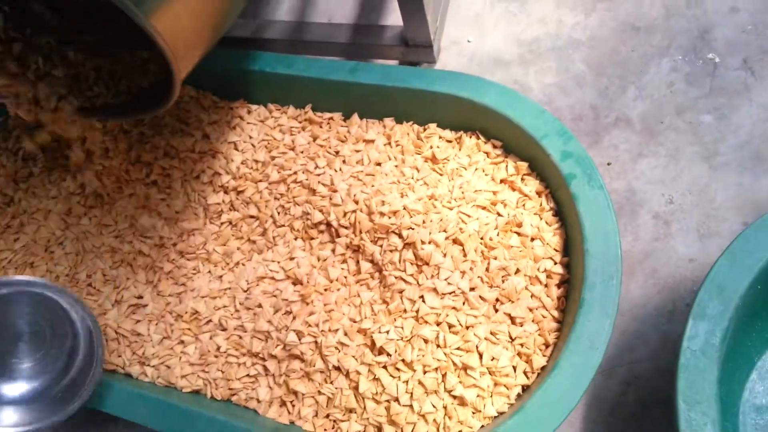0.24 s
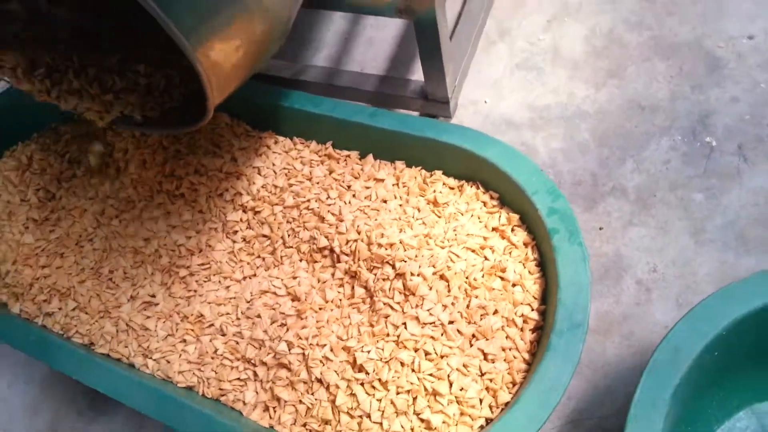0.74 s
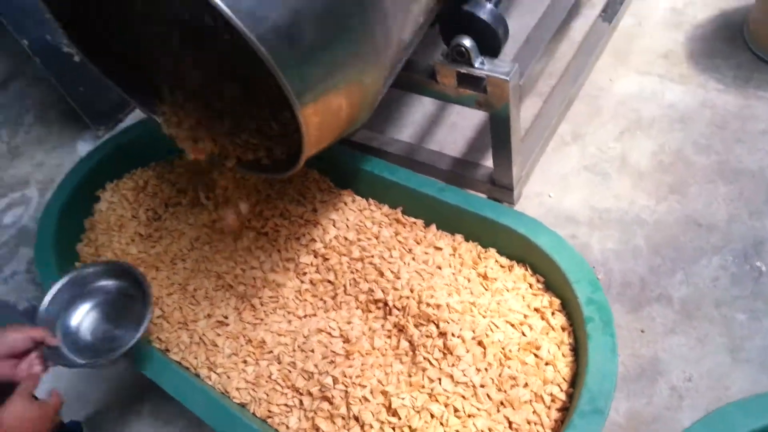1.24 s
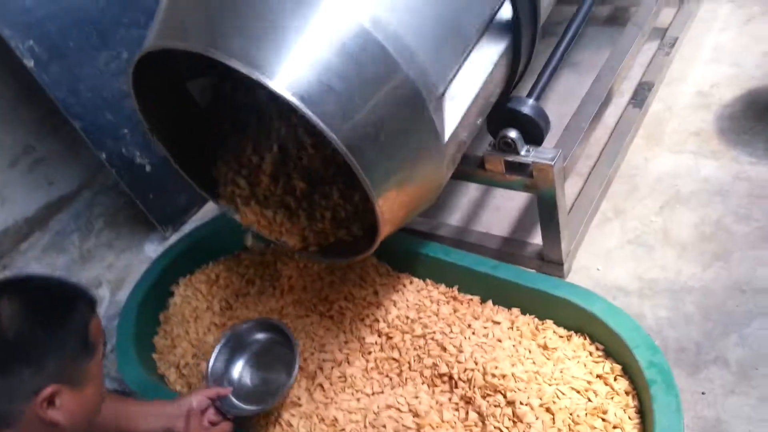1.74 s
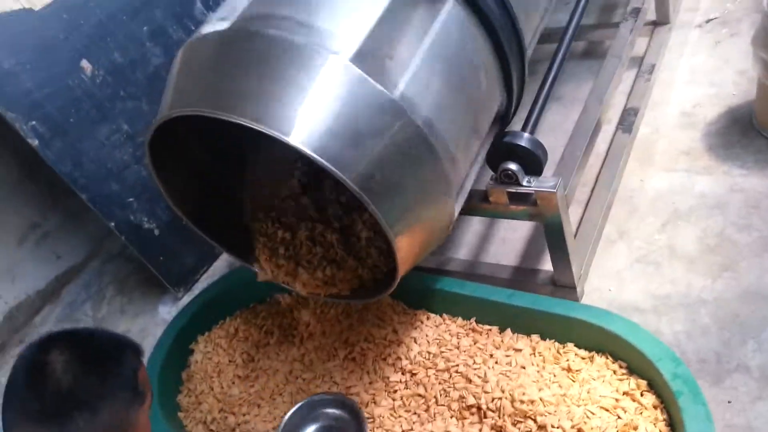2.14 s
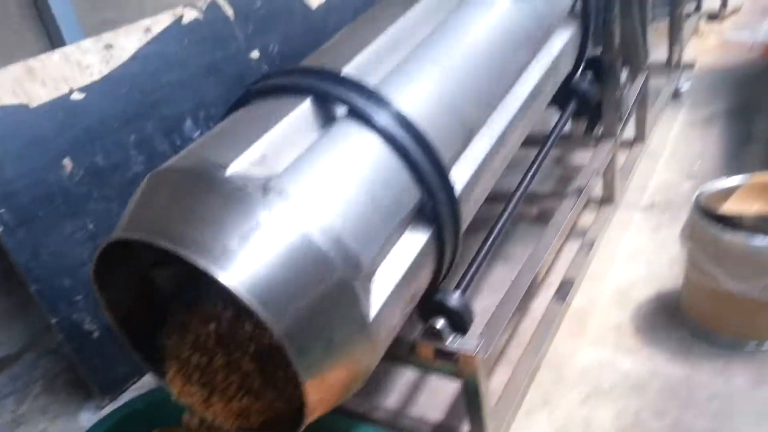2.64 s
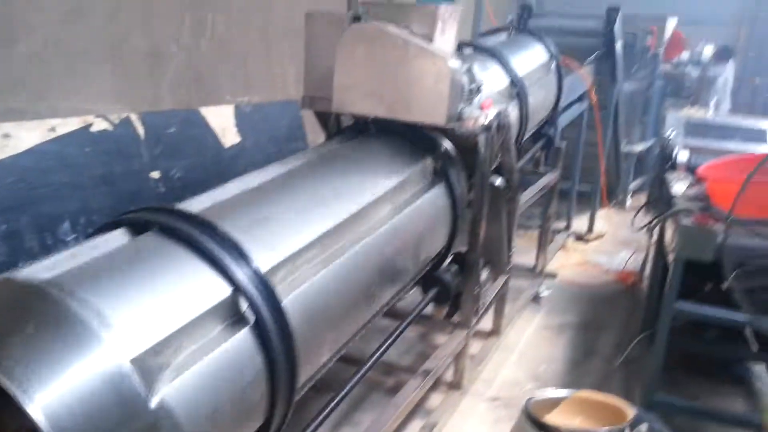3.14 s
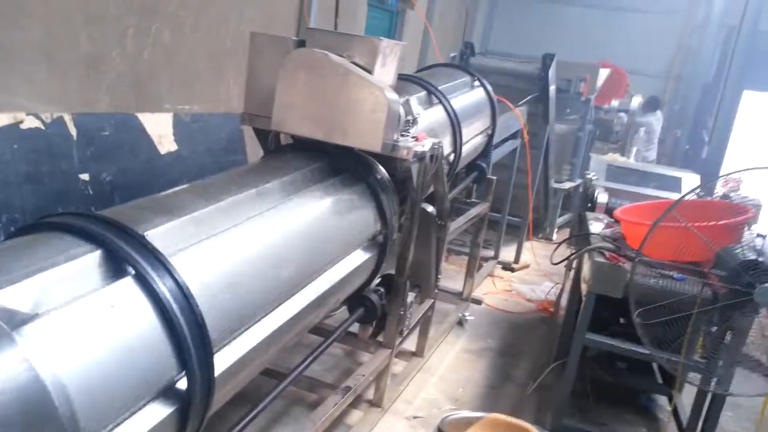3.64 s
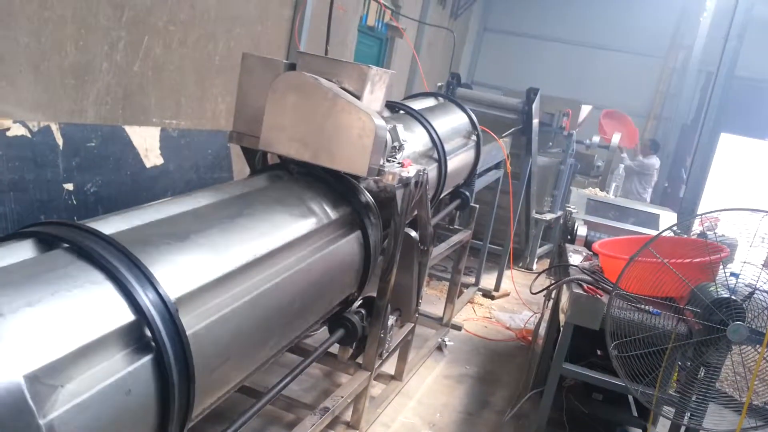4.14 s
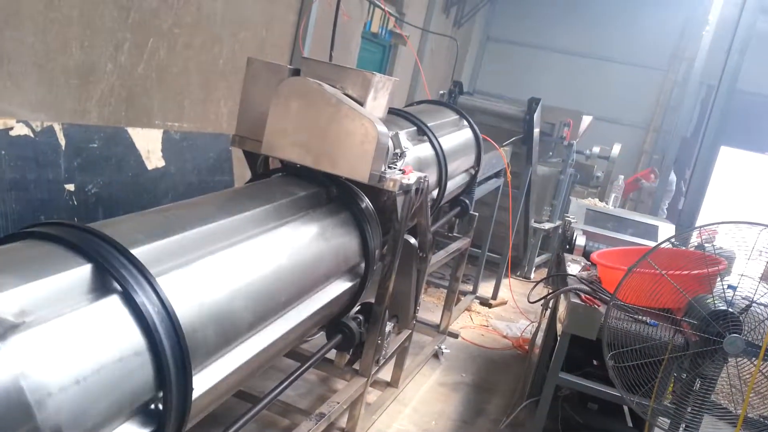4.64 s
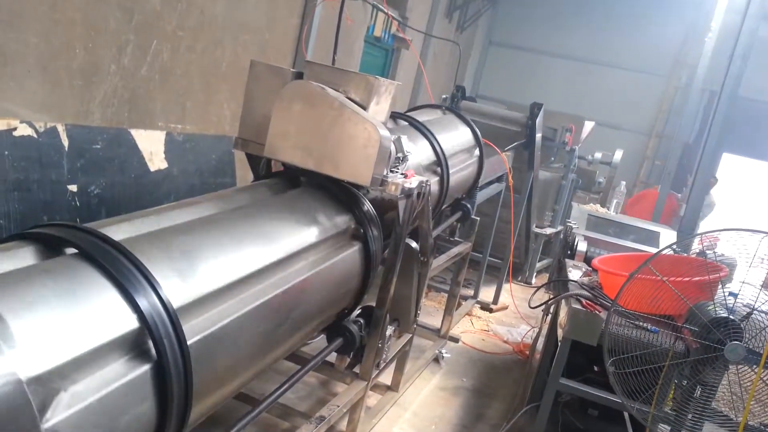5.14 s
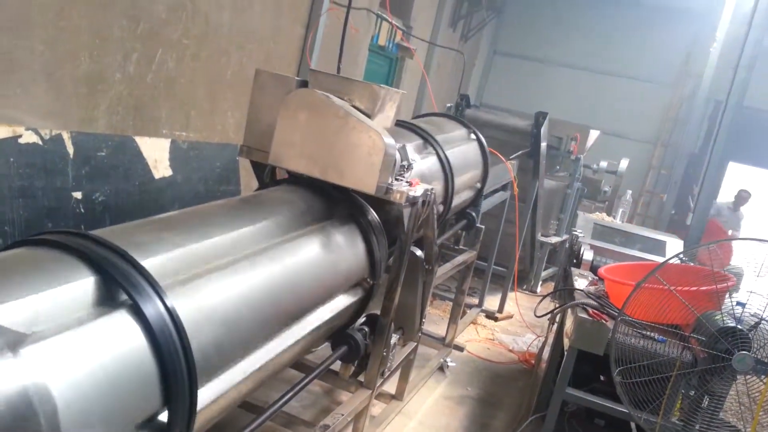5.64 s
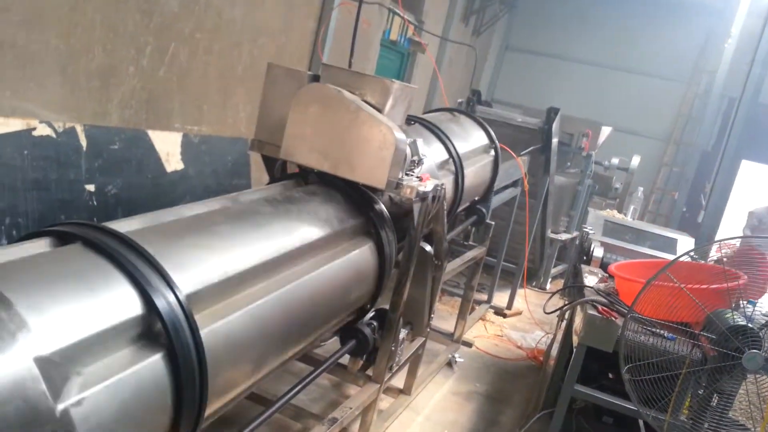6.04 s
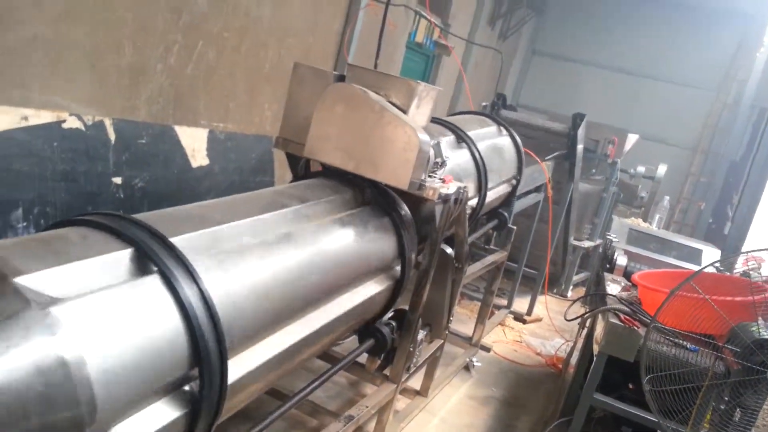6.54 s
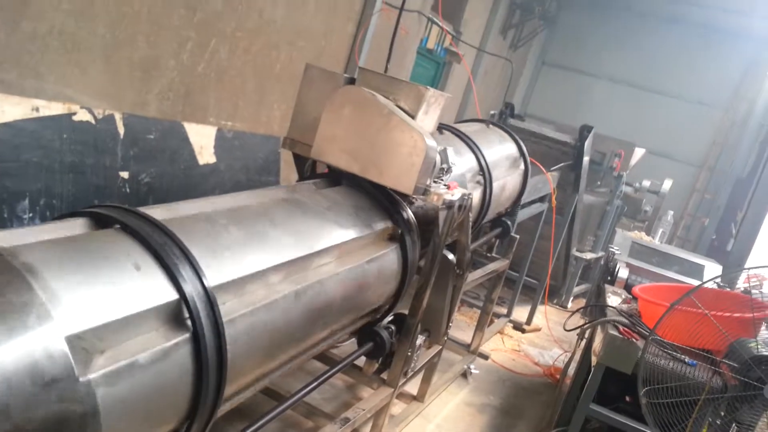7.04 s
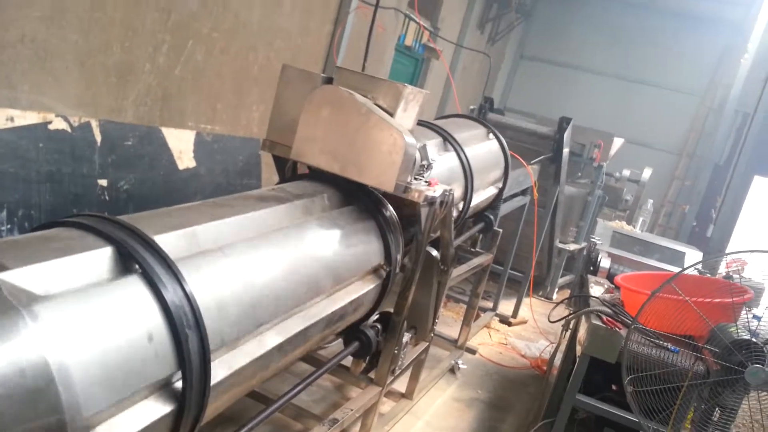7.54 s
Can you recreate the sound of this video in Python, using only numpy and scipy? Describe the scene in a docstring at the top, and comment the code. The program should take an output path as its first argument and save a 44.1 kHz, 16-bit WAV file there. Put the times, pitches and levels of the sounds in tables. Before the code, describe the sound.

A loud, dense, unbroken rush of light, dry pellets tumbling in a turning steel drum fills the whole eight seconds, wide in stereo and close. Countless clicks blend into midrange rattle, brighter clatter and crisp brittle crackle, with tiny short metallic pings. From 0 to about 1.5 s pellets also patter dully into a plastic tub, with small low bumps near 0.3 s and a faint high tick on the left at 1 s. Around 1.9 to 2.4 s the microphone crosses the drum's open mouth and a hollow, fluttering boom swells with soft thuds. By 3.3 s it is beside the drum: the boom recedes, the crackle eases, and a motor buzz with a steady whine near 900 Hz becomes clear, beating about twice a second. The load surges gently once a second over faint shell rumble, continuing to the end without stopping.

```python
"""In a workshop, fried snack pellets tumble in a turning steel drum and spill from its mouth into a tub.
Thousands of random light clicks merge into a rush, a clatter and a crackle; single pellets ping as short sines.
The open tube booms through its air resonances, the shell rumbles, and the geared drive buzzes and whines.
The stereo microphone starts at the mouth, passes its opening near 2 s, then moves beside the drum to the drive."""
import sys
import numpy as np
from scipy import signal
from scipy.fft import rfft, irfft, next_fast_len
from scipy.io import wavfile
from scipy.ndimage import uniform_filter1d, minimum_filter1d

SR = 44100
rng = np.random.default_rng(int(sys.argv[2]) if len(sys.argv) > 2 else 0)


def digitize_waveform(pressure):
    """Quantize a signal to 16-bit integers and store it at the path in sys.argv[1].

    Rows of a 2-D input are taken as channels; values are limited to [-1, 1].
    """
    field = np.atleast_2d(pressure).T
    bounded = np.clip(field, -1, 1)
    quanta = np.round(bounded * 32767).astype(np.int16)
    wavfile.write(sys.argv[1], SR, quanta)


N = 343971
TIME = np.arange(N) / SR

# Most spectra give shape only, their layers being brought to rms 1; the buzz spectrum sets its level directly.
# Microphone path: (time [s], place [0 = at the mouth, 1 = beside the drum, nearest the drive])
MIC_PATH = [(0, 0.053), (1.0, 0.4), (2.0, 0.069), (2.7, 0.13), (3.25, 0.68), (3.8, 0.74), (5.0, 0.88),
            (5.8, 0.93), (7.8, 0.97)]
# Flow changes as a bigger heap lets go or the flow thins, before each layer takes its share:
# (time [s], half length [s], change [dB])
HEAP_SLIDES = [(.645, .025, 0.5), (.73, .08, 0.3), (.98, .015, -2), (1.105, .02, -1.4), (1.298, 0.055, 0),
               (1.86, .025, 1.5), (1.915, .015, -1.5), (2.02, 0.087, 1), (2.68, 0.092, -1.6),
               (2.884, 0.03, 2), (3.72, 0.072, 1), (3.95, 0.066, 1), (4.3, 0.084, 1.5), (4.68, .09, 1),
               (4.96, 0.054, .8), (6.53, .06, 0), (6.85, 0.07, .9), (7.22, 0.056, -1.8), (7.5, 0.17, -1)]
# Pellets on steel: (frequency [Hz], density at the mouth [dB per Hz], density beside the drum [dB per Hz])
RUSH_SPECTRUM = [(199, -58, -41), (383, -18, -5.5), (556, -6, -10), (756, -5, -5.5), (960, 0.5, -1.5),
                 (1480, -1, 1), (1840, 0.5, -2), (2180, -1.5, 4), (3120, -1.5, 0), (4160, -9, -10),
                 (4950, -28, -28), (6000, -34, -32), (15000, -70, -70)]
# Pellets on pellets: (frequency [Hz], density at the mouth [dB per Hz], density beside the drum [dB per Hz])
CLATTER_SPECTRUM = [(500, -49, -52), (2400, -16, -17), (3300, 0, 2), (4520, -0.5, -0.5), (5170, -8, -5),
                    (5840, -19, -22), (8000, -22, -18), (15000, -53, -55)]
# Brittle pellet edges: (frequency [Hz], density at the mouth [dB per Hz], density beside the drum [dB per Hz])
CRACKLE_SPECTRUM = [(1000, -50, -50), (3970, -11, -14), (5100, 1, 0), (6500, -2, -3.5), (7800, -1, -3),
                    (9460, -3, -7), (11300, -6, -9.5), (13030, -17.5, -18.5), (14700, -35, -33)]
# Treble level on which the crackle is set: (time [s], level [dB])
TREBLE_LEVEL = [(0.0, -31), (0.91, -29), (0.95, -29), (1.52, -28), (2.93, -28.5), (3.91, -31), (6.3, -31.5),
                (6.7, -33.2), (7.1, -31.5), (7.8, -32)]
# Short spurts of crisp crackle: (time [s], half length [s], swell [dB])
CRACKLE_SPURTS = [(.66, .06, 2), (1.68, .04, 1.5), (2.9, .1, 0.5), (3.43, 0.038, 2.8), (5.55, 0.066, 1.5)]
# Side the pellets are heard on: (frequency [Hz], left minus right at the mouth [dB], and beside the drum [dB])
PELLET_SIDES = [(150, -8, -11), (700, -5.5, 4), (1150, -1.5, -3), (1820, 0, 2), (3000, 0.5, -1),
                (4200, 0.5, -3.5), (6300, 0.5, -3.5), (9600, .5, -1), (12000, 0.5, 2.5), (13600, 9, 21)]
# Pellets on the heap in the plastic tub: (frequency [Hz], density [dB per Hz])
SPILL_SPECTRUM = [(200, -28), (400, -7), (550, -7.5), (700, 0), (950, -4), (1150, -3), (1600, 4),
                  (2100, -2), (3000, -7), (4500, -23), (9000, -40)]
# Air resonances of the tube: (frequency [Hz], width [Hz], level off its axis [dB], level on its axis [dB])
AIR_MODES = [(325, 68, 2, -2.5), (410, 49, 3.5, 0.5), (535, 69, 3, 1), (644, 59, 8, 3), (779, 88, 11.5, 6),
             (875, 56, -22, 4)]
# Thuds and a brief dip in the tube's boom: (time [s], change of the boom [dB])
BOOM_CHANGES = [(1.96, 7), (1.99, 4), (2.07, 3), (2.135, -2), (2.25, 2.5)]
# Dense shaft orders of the drive, before the place and odd-order trims: (frequency [Hz], level [dB per order])
BUZZ_SPECTRUM = [(100, -74), (300, -51.5), (500, -42), (800, -45), (1100, -43.5), (1400, -31), (2000, -30),
                 (2500, -31.5), (3000, -33.5), (4300, -35.5), (5200, -42.5), (6000, -49), (9000, -60),
                 (12000, -75)]
# Gear tones before swells and screening; the mesh is order 18, its whine 36:
# shaft order: (level at the mouth [dB], level beside the drum [dB], left minus right beside the drum [dB])
GEAR_LINES = {8: (-50, -47.5, 0), 18: (-33, -29.5, 0), 22: (-43, -48, 0), 24: (-52, -37, 0),
              25: (-38, -56, -6), 26: (-37.5, -44, 15), 28: (-39, -37.5, 3), 30: (-35.5, -46, 8),
              31: (-42, -56, 2), 32: (-54, -53, 0), 34: (-39.5, -24, 2.9), 35: (-34, -43, 4),
              36: (-35, -17.5, 0), 39: (-40.5, -52, 0), 40: (-43, -31.5, 1), 42: (-43, -37, -11),
              44: (-44, -36.5, 3), 45: (-36, -43, -6), 46: (-44, -33, 2), 48: (-34, -45, -1),
              50: (-43, -33.5, 2), 61: (-40, -43.5, 7.6), 62: (-45, -36.5, -13), 63: (-35, -38.5, 0),
              64: (-42, -36, -3), 68: (-47, -28.5, 3.9), 74: (-46, -32, -1), 100: (-52, -28.5, 3)}
# The gear mesh, and its whine with the two sidebands below: (shaft order)
MESH_LINES = [18, 34, 35, 36]
# Tones swell and fade as the microphone passes through their standing waves:
# shaft order: [(time [s], half length [s], change [dB])]
STANDING_WAVES = {8: [(.38, 0.13, 22), (2.62, 0.11, 9)], 18: [(.85, .45, 0.5), (1.7, 0.31, -6),
                  (2.55, 0.22, -7.5), (3.7, .7, 0.5)], 26: [(1.7, 0.49, 7)], 28: [(.7, .2, 6),
                  (1.85, .3, 3), (3.5, 0.75, -13)], 30: [(.7, 0.44, 12), (2.42, 0.47, 10.5), (7.3, .7, 4)],
                  31: [(4.4, 1.2, 7)], 32: [(2.08, .22, 18)], 34: [(.6, 0.16, 3), (1.5, .3, 5),
                  (4.2, 1.0, 2.5), (7.3, 0.74, -1.5)], 35: [(1.3, 0.31, 4), (3.05, .2, -8),
                  (4.4, 1.25, 13)], 36: [(.85, 0.34, -1.5), (1.5, 0.21, -8), (2.65, 0.19, -5),
                  (3.15, .3, -1), (6.55, 0.1, 1.3)], 39: [(2.3, 0.46, 9), (4.4, 1.0, 18)],
                  40: [(1.3, .3, 3)], 42: [(3.0, 0.22, 14.5), (3.7, .5, 4.5), (5.9, .4, 3)],
                  44: [(.8, 0.43, 17), (2.45, .2, 10), (7.1, .3, 1)], 45: [(1.15, 0.43, 11.5),
                  (2.75, 0.2, 4)], 46: [(1.2, 0.15, 10)], 48: [(.85, .15, -3), (1.75, .3, 2)],
                  61: [(4.3, 1.4, 11.5)], 62: [(7.2, 1, 3)], 63: [(4.6, 1.4, 10.5)], 64: [(7.4, .7, 6)],
                  68: [(6.9, 1.0, 2)]}
# Near a node a tone reaches the two channels out of step:
# shaft order: (time [s], half length [s], phase shift of each channel, in opposite directions [radians])
STANDING_NODES = {18: (1.67, 0.58, 1.0), 42: (6.7, 3.0, 0.52), 68: (7.67, 2.2, 1.07), 74: (7.2, 2.4, 1)}
# One channel hears more of a tone: shaft order: [(time [s], half length [s], left minus right [dB])]
TONE_LEANS = {18: [(.95, 0.57, 7), (2.3, .45, -14)], 28: [(1.4, .9, -9)], 35: [(1.3, .4, 7)]}
# Shell and room: (frequency [Hz], density [dB per Hz])
RUMBLE_SPECTRUM = [(25, -14), (75, -21), (110, -34), (140, -25.5), (175, -8.5), (220, -6.5), (285, 1),
                   (390, -4), (500, -7.5), (900, -13.5), (3000, -57)]
# The shell rumbles up under the load: (time [s], half length [s], swell [dB])
RUMBLE_SWELLS = [(.3, 0.18, 3), (.305, .016, 8), (.355, .016, 8.5), (1.5, 0.12, 3.5), (2.255, 0.018, 3),
                 (5.45, .15, 1.5)]
# One thin, high tick on the left: (time [s], frequency [Hz], level on the left [dB], 60 dB decay [s])
HIGH_TICK = (1.008, 14150, -27, .04)
# Stereo likeness: (frequency [Hz], left-right likeness [-1 = opposed, 0 = unrelated, 1 = alike])
STEREO_LIKENESS = [(60, 0.64), (140, 0.45), (300, 0.93), (550, 0.66), (780, 0.71), (1000, 0.07),
                   (1300, -0.053), (1750, -0.39), (2200, 0.052), (2800, 0.11), (4000, -0.052),
                   (6000, -0.0059)]

# the load rides up and slides back once a turn
DRUM_TURN_S, FIRST_SLIDE_S = 1.0, 0.78
CRACKLE_OVER_TREBLE_DB = 4
PING_LOW_HZ, PING_HIGH_HZ, PING_T60_S = 1590, 3808, 0.041
# the microphone rises away from the tub
TUB_LEFT_S, TUB_FADE_S = 1.37, 0.36
# the microphone crosses the axis of the open tube
CROSSING_S, CROSSING_HALF_S = 2.13, 0.29
# each change of the boom sets in over the rise, around a peak with this decay
CHANGE_RISE_S, CHANGE_DECAY_S = 0.004, 0.022
MOTOR_HZ = 24.812  # shaft turns per second
# at first the microphone is low over the tub, where the drum screens it from the gear tones
SCREENED_UNTIL_S, SCREEN_FADE_S, SCREEN_DB = 0.46, 0.041, -8
LOW_CUT_HZ, CUTOFF_HZ = 131, 14700
CEILING = 0.97  # limiter ceiling, of full scale


def tumbling(turn_db, uneven_db, uneven_rate):
    """Flow of the load in dB: one slide a turn, heaps letting go, and a slow unevenness."""
    slides = turn_db * np.cos(2 * np.pi * (TIME - FIRST_SLIDE_S) / DRUM_TURN_S)
    return slides + swells_db(HEAP_SLIDES) + uneven_db * drift(uneven_rate)


def pellets(spectrum, place, per_s, spread_db, clump_db, clump_rate):
    """Pellet clicks fall in small clumps; their colour and side follow the microphone's place."""
    clicks, hz = contacts(per_s, spread_db)
    ends = []
    for colour_db, side_db in zip(at_hz(spectrum, hz), at_hz(PELLET_SIDES, hz)):
        stereo_db = [colour_db + side_db / 2, colour_db - side_db / 2]
        ends.append(sounded(clicks * from_db(stereo_db)))
    mouth, beside = ends
    clumps = from_db(clump_db * drift(clump_rate))
    return ((1 - place) * mouth + place * beside) * clumps


def pings(spread_db, pan_db, attack_s, count=3600, size=2048):
    """Single hard pellets ring briefly off the steel, each at a pitch and on a side of its own."""
    out = np.zeros((2, N + size))
    age = np.arange(size) / SR
    fade = from_db(-60 * age / PING_T60_S) * (1 - np.exp(-age / attack_s))
    for when, pitch, strength, side, phase in rng.random((count, 5)):
        hz = PING_LOW_HZ * (PING_HIGH_HZ / PING_LOW_HZ) ** pitch
        pan = pan_db * (side - 0.5) * np.array([[1], [-1]])
        gain = from_db(spread_db * strength ** 2 + pan)
        # the right channel leads by up to one full cycle
        ring = np.sin(2 * np.pi * (hz * age + np.array([[0], [phase]])))
        start = int(when * N)
        out[:, start:start + size] += gain * fade * ring
    return rms_one(out[:, :N])


def tub(level_db, per_s, spread_db, clump_db, clump_rate):
    """Pellets drop from the mouth into the tub: a dull, lumpy patter while the microphone is over it."""
    clicks, hz = contacts(per_s, spread_db)
    patter = sounded(clicks * from_db(at_hz(SPILL_SPECTRUM, hz)[0]))
    near = (1 - np.tanh((TIME - TUB_LEFT_S) / TUB_FADE_S)) / 2
    return near * from_db(level_db + clump_db * drift(clump_rate)) * patter


def boom(place, mouth_db, beside_db, axis_db, flutter_db, flutter_rate):
    """The tube booms softly all along, fully on its axis; the falling load makes it flutter."""
    off_axis, on_axis = tube(per_s=900, spread_db=1.0)
    facing = np.exp(-((TIME - CROSSING_S) / CROSSING_HALF_S) ** 4)
    changes_db = 0
    for s, db in BOOM_CHANGES:
        rise = np.clip((TIME - s) / CHANGE_RISE_S, 0, 1)
        changes_db = changes_db + db * rise * np.exp(-np.abs(TIME - s) / CHANGE_DECAY_S)
    load = from_db(changes_db + flutter_db * drift(flutter_rate))
    soft = (1 - facing) * from_db(by_place(place, mouth_db, beside_db)) * off_axis
    full = facing * from_db(axis_db) * on_axis
    return load * (soft + full)


def tube(per_s, spread_db):
    """Pellets landing inside ring the drum's air column; gives its sound off and on the axis."""
    clicks, hz = contacts(per_s, spread_db)
    modes = []
    for k, (f, width, *_) in enumerate(AIR_MODES):
        # neighbouring resonances alternate in sign
        modes.append((-1) ** k * 1j * hz * width / (f * f - hz * hz + 1j * hz * width))
    modes = np.array(modes)
    # little sound below the lowest resonance
    opening = hz ** 4 / (hz ** 4 + AIR_MODES[0][0] ** 4 / 10)
    return [sounded(clicks * opening * (from_db(db) @ modes)) for db in np.transpose(AIR_MODES)[2:]]


def drive(place, speed_wander):
    """A mains motor turns the drum through gears at nearly constant speed; whine and sideband beat twice a turn."""
    turns = np.cumsum(MOTOR_HZ * (1 + speed_wander * drift(1.48))) / SR
    screen_db = SCREEN_DB * (1 - np.tanh((TIME - SCREENED_UNTIL_S) / SCREEN_FADE_S)) / 2
    out = from_db(by_place(place, mouth_db=-5.5, beside_db=-2.5)) * buzz(turns, place, odd_db=-8.0)
    for order, (mouth_db, beside_db, side_db) in GEAR_LINES.items():
        lean_db = side_db * place + swells_db(TONE_LEANS.get(order, []))
        level_db = by_place(place, mouth_db, beside_db) + swells_db(STANDING_WAVES.get(order, []))
        level_db = level_db + screen_db + lean_db * np.array([[0.5], [-0.5]])
        if order in MESH_LINES:
            # once a turn the shaft wobbles in speed, not in force:
            # the odd sideband runs a quarter cycle off and leaves the beat even
            head_start = order % 2 / 4
            out += tone(order, level_db, turns, head_start, waver_db=0.85, waver_rate=3.5, port_radians=0.2)
        else:
            head_start = rng.random()
            out += tone(order, level_db, turns, head_start, waver_db=1.1, waver_rate=2.4, port_radians=0.32)
    return out


def tone(order, level_db, turns, head_start, waver_db, waver_rate, port_radians):
    """One shaft order is a sine locked to the shaft; it wavers, and its phase differs between channels."""
    phase = 2 * np.pi * (order * turns + head_start)
    apart = port_radians * (1 - at_hz(STEREO_LIKENESS, order * MOTOR_HZ)[0]) * drift(0.22)
    if order in STANDING_NODES:
        s, half_s, radians = STANDING_NODES[order]
        apart = apart + radians * swell(s, half_s)
    gain = np.sqrt(2) * from_db(level_db + waver_db * drift(waver_rate))
    return gain * np.sin([phase + apart, phase - apart])


def buzz(turns, place, odd_db, count=400, size=8192):
    """The drive repeats a rattle every turn; standing waves reshuffle it as the microphone moves."""
    orders = np.arange(1, count)
    hz = orders * MOTOR_HZ
    # orders with a tone of their own are left out; odd orders are weaker
    weak = ~np.isin(orders, list(GEAR_LINES))
    gain = from_db(at_hz(BUZZ_SPECTRUM, hz)[0] + odd_db * (orders % 2)) * weak
    travel = 2 * place + TIME / TIME[-1] * 3
    out = 0
    # six spots along the way, each with its own phases, crossfaded
    for spot in range(6):
        lines = two_ports(np.exp(2j * np.pi * rng.random((2, len(orders)))), hz) * gain
        one_turn = irfft(np.pad(lines, ((0, 0), (1, 0))), size) * size / np.sqrt(2)
        rattle = np.array([np.interp(turns % 1 * size, np.arange(size), side) for side in one_turn])
        nearness = np.cos(np.pi / 2 * np.clip(travel - spot, -1, 1))
        out = out + nearness * rattle
    return out


def shell(per_s, spread_db):
    """The weight of the load makes the steel shell rumble: clicks shaped to a low spectrum."""
    clicks, hz = contacts(per_s, spread_db)
    return sounded(clicks * from_db(at_hz(RUMBLE_SPECTRUM, hz)[0]))


def tick(right_db):
    """A tiny, short ring: one decaying sine, stronger on the left."""
    s, hz, db, t60 = HIGH_TICK
    age = np.maximum(TIME - s, 0)
    fade = np.exp(-np.log(1000) * np.minimum(age / t60, 2))
    return from_db([[db], [db + right_db]]) * fade * np.sin(2 * np.pi * hz * age)


def contacts(per_s, spread_db):
    """Stereo spectrum of random pellet clicks, many small and a few large, with its frequency axis."""
    size = next_fast_len(N)
    strength = from_db(spread_db * np.minimum(rng.exponential(1, (2, size)), 5))
    lands = rng.random((2, size)) < per_s / SR
    clicks = lands * strength * rng.choice([-1, 1], (2, size))
    hz = np.arange(size // 2 + 1) * SR / size
    return two_ports(rfft(clicks), hz), hz


def two_ports(pair, hz):
    """Two unrelated spectra become left and right: mostly alike low down, apart in the treble."""
    alike = np.clip(at_hz(STEREO_LIKENESS, hz)[0], -1, 1)
    mid = np.sqrt(1 + alike) * pair[0]
    side = np.sqrt(1 - alike) * pair[1]
    return np.array([mid + side, mid - side]) / np.sqrt(2)


def sounded(spectrum):
    """A spectrum back to a waveform of rms 1."""
    return rms_one(irfft(spectrum)[:, :N])


def rms_one(x):
    """Scale to rms 1."""
    return x / np.sqrt(np.mean(x ** 2) + 1e-20)


def drift(rate):
    """Slow random wander of rms 1: noise through two equal low-pass poles at rate [Hz]."""
    step = 100  # samples between control points
    r = np.exp(-2 * np.pi * rate * step / SR)
    noise = rng.standard_normal(N // step + 2002)
    slow = signal.lfilter([1], [1, -2 * r, r * r], noise)[2000:]  # the filter has settled
    return np.interp(np.arange(N) / step, np.arange(len(slow)), rms_one(slow))


def swell(at_s, half_s):
    """A smooth rise to 1 and back."""
    return np.exp(-((TIME - at_s) / half_s) ** 2)


def swells_db(rows):
    """A table of swells, summed in dB."""
    return sum(db * swell(s, half_s) for s, half_s, db in rows)


def by_place(place, mouth_db, beside_db):
    """A level glides from its value at the mouth to its value beside the drum."""
    return mouth_db + (beside_db - mouth_db) * place


def in_time(rows):
    """Each column of a curve at every sample."""
    s, *columns = np.transpose(rows)
    return [np.interp(TIME, s, c) for c in columns]


def at_hz(points, hz):
    """Each column of a spectrum, read on a log-frequency axis."""
    f, *columns = np.transpose(points)
    return [np.interp(np.log(np.maximum(hz, 1)), np.log(f), c) for c in columns]


def from_db(db):
    """Decibels to gain."""
    return 10 ** (np.asarray(db) / 20)


def scene():
    """Pellets, tub, tube, drive and shell together, most of them levelled by the microphone's place."""
    place = np.clip(in_time(MIC_PATH)[0], 0, 1)
    flow_db = tumbling(turn_db=0.26, uneven_db=0.46, uneven_rate=9.7)

    rush_db = by_place(place, mouth_db=-14.0, beside_db=-15.0) + 1.03 * flow_db
    rush = pellets(RUSH_SPECTRUM, place, per_s=9000, spread_db=2.5, clump_db=0.1, clump_rate=19)
    clatter_db = by_place(place, mouth_db=-19.0, beside_db=-22.0) + 1.3 * flow_db
    clatter = pellets(CLATTER_SPECTRUM, place, per_s=12000, spread_db=2.0, clump_db=0.5, clump_rate=19)
    crackle_db = in_time(TREBLE_LEVEL)[0] + CRACKLE_OVER_TREBLE_DB
    crackle_db = crackle_db + swells_db(CRACKLE_SPURTS) + 0.31 * flow_db
    crackle = pellets(CRACKLE_SPECTRUM, place, per_s=14000, spread_db=0.5, clump_db=0.5, clump_rate=17)
    ringing_db = by_place(place, mouth_db=-23.0, beside_db=-25.5) + flow_db
    ringing = pings(spread_db=6.5, pan_db=8, attack_s=0.00028)
    load = from_db(rush_db) * rush + from_db(clatter_db) * clatter
    load += from_db(crackle_db) * crackle + from_db(ringing_db) * ringing

    spill = tub(level_db=-23.0, per_s=1500, spread_db=2.0, clump_db=2.5, clump_rate=16)
    hollow = boom(place, mouth_db=-27.0, beside_db=-48.5, axis_db=-21.5, flutter_db=2.5, flutter_rate=16)
    gears = drive(place, speed_wander=0.0003965)
    rumble_db = by_place(place, mouth_db=-34.5, beside_db=-37.0) + swells_db(RUMBLE_SWELLS) + 0.75 * drift(3.0)
    rumble = from_db(rumble_db) * shell(per_s=2800, spread_db=3.5)
    return load + spill + hollow + gears + rumble + tick(right_db=-10)


def record(dry):
    """The microphone thins the deep bass, a quick limiter holds the highest peaks, the top is cut steeply."""
    low_cut = signal.butter(2, LOW_CUT_HZ, "high", fs=SR, output="sos")
    thin = signal.sosfilt(low_cut, dry)
    room_left = CEILING / np.maximum(np.abs(thin), CEILING)
    gain = uniform_filter1d(minimum_filter1d(room_left, size=257), size=257)
    # 0.1 dB ripple below the cutoff, 70 dB down above it
    top_cut = signal.ellip(12, 0.1, 70, CUTOFF_HZ, fs=SR, output="sos")
    return signal.sosfilt(top_cut, thin * gain)


dry = scene()
out = record(dry)
digitize_waveform(out)
```